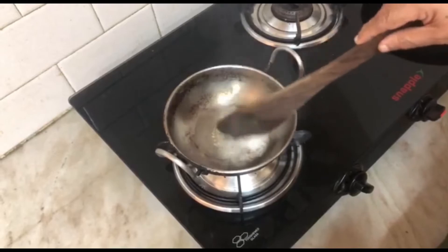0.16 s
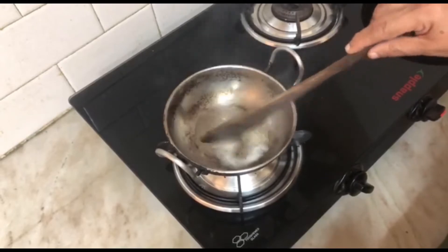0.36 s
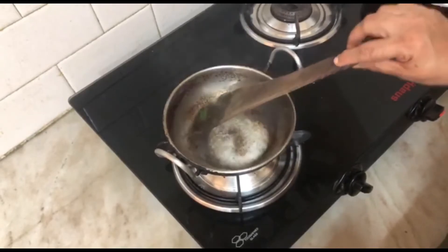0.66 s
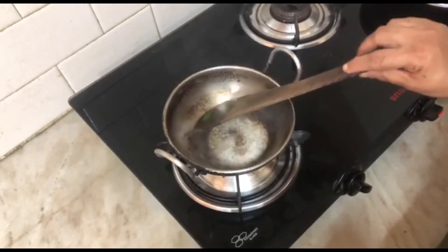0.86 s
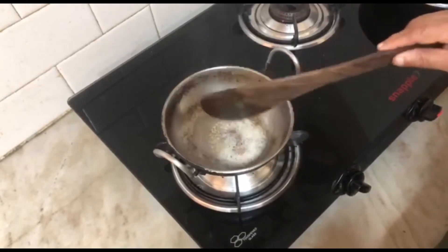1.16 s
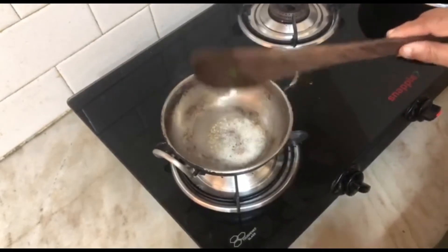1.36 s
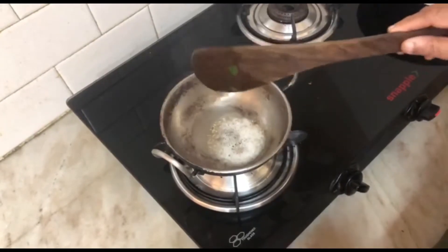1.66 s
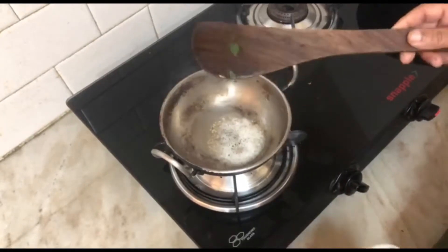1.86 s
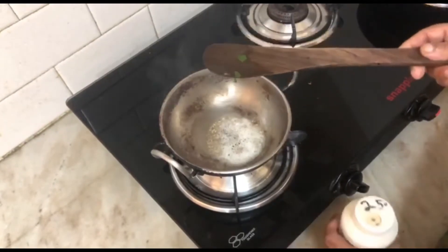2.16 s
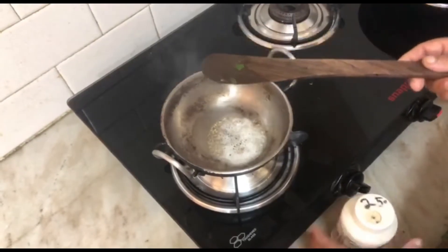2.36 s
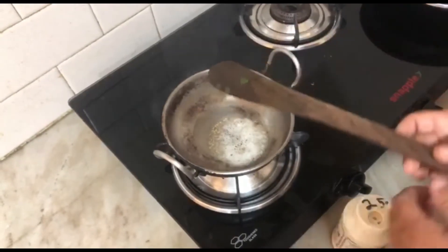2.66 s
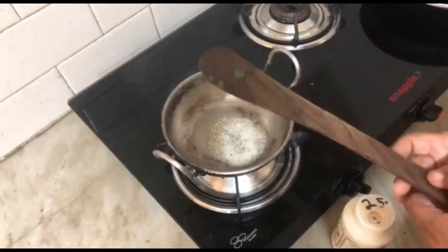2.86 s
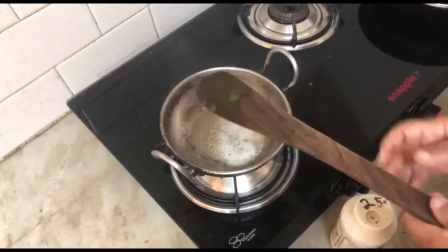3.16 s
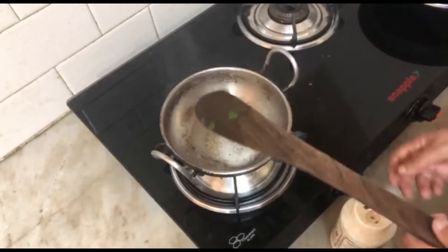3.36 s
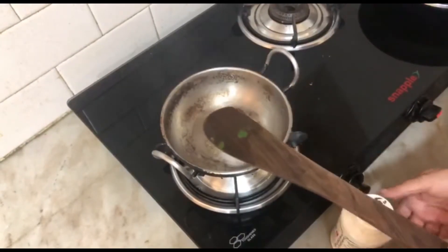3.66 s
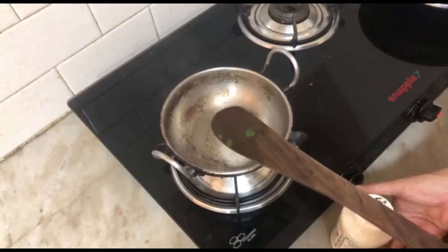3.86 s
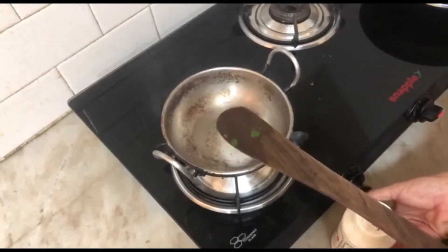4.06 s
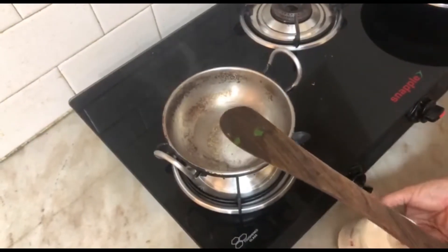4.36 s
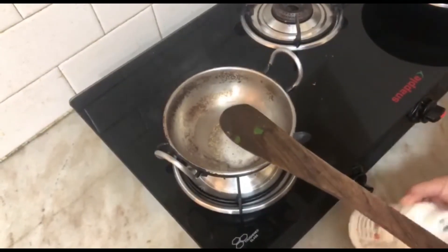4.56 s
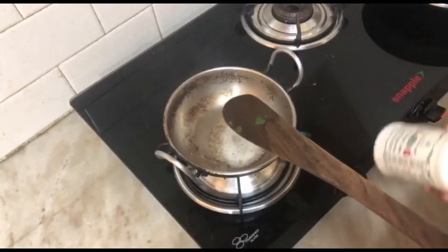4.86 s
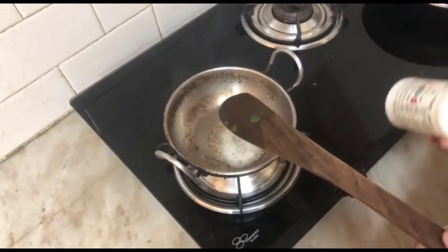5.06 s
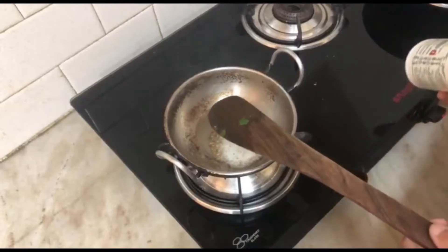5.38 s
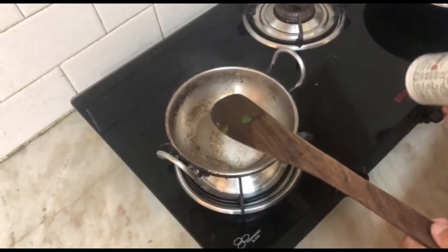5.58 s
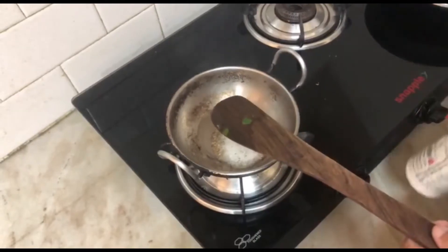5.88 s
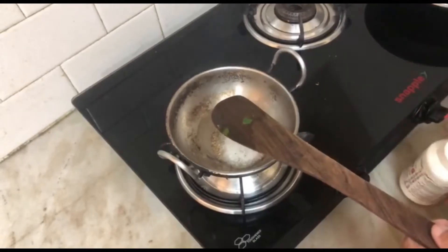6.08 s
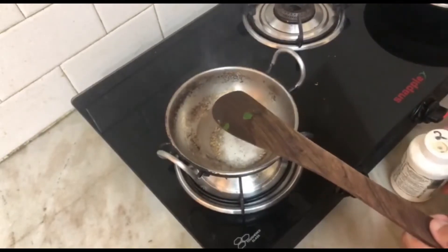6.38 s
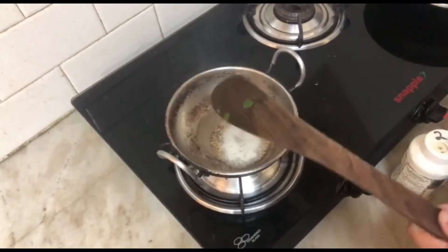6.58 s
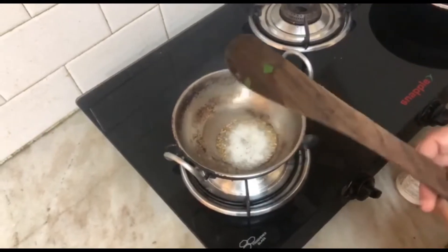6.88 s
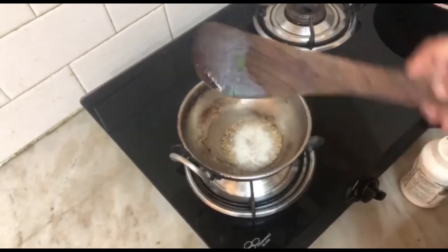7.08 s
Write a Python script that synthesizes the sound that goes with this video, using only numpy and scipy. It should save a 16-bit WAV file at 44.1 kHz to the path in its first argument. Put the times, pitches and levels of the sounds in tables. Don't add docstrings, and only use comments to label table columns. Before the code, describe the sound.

A soft, steady gas-flame rush with a low room hum runs for about seven seconds, under a faint fizz and tiny bubbling from oil in a small steel pan. From 0 to 0.9 s a wooden spatula drags and scrapes in short grainy hisses while seeds burst thickly; the loudest crack is near 0.17 s, another sharp one at 0.4 s. Small spits patter until 1.5 s, when a strong round pop comes at 1.56 s. Lighter pops and a faint knock follow around 2.1 s, then clusters near 2.9, 3.4, 3.7 and 4.5 s, with weak bumps near 4.0 and 4.25 s. A bright loud snap hits at 5.37 s. At 6.06 s a jar thuds hollowly on the hob, with smaller knocks from 6.27 to 6.43 s. Sparse tiny plops end it. Close microphone, short tiled echo.

```python
import sys
import numpy as np
from scipy import signal
from scipy.fft import rfft, irfft, next_fast_len
from scipy.io import wavfile
from scipy.ndimage import uniform_filter1d

SR = 44100
rng = np.random.default_rng(int(sys.argv[2]) if len(sys.argv) > 2 else 0)


def inscribe(sig):
    pcm = np.round(np.clip(np.atleast_2d(sig).T, -1, 1) * 32767)
    wavfile.write(sys.argv[1], SR, pcm.astype(np.int16))


N = 318842

# frequency_hz, density_db
FLAME_SPECTRUM = [(88, -45), (150, 1), (419, -0.5), (627, -4), (739, 2), (973, -10), (1240, -4.5),
                  (1720, -9.5), (2180, -10), (2570, -10.5), (5660, -19.5), (10400, -29), (12000, -33),
                  (15600, -71), (22000, -120)]
# frequency_hz, width_hz, level_db
ROOM_HUM = [(52, 17, -63), (94.7, 30, -60.5), (134.6, 12.4, -66.5), (178, 55, -72.5), (285, 33, -73.5)]
# time_s, level_db
FIZZ_LEVEL = [(0.9, -60.5), (1.27, -62.5), (1.66, -63), (2.59, -62), (3.26, -67), (3.58, -63),
              (4.16, -66.5), (4.87, -61), (5.26, -67), (5.5, -63), (6.29, -59.5), (6.45, -69), (7.23, -67)]
# frequency_hz, gain_db
FIZZ_SPECTRUM = [(600, -18), (1200, -8), (2000, -2), (3000, -11.5), (5000, -6), (7000, -10), (9000, -16.5),
                 (12000, -13)]
# frequency_hz, t60_s, rate_per_s, level_db
BOWL_MODES = [(755.4, 0.073, 35, -65.5), (1273, 0.098, 50, -72), (1971, 0.032, 56, -71),
              (2227, 0.027, 50, -69.5), (3100, 0.012, 29, -76)]
# start_s, length_s, level_db
STROKES = [
    (.001, 0.16, -51),
    (.17, 0.17, -52.5),
    (0.409, 0.079, -53),
    (0.705, 0.09, -51),
    (.83, .05, -64),
]
# frequency_hz, gain_db
RUB_SPECTRUM = [(150, 2.5), (300, -0.5), (700, 2), (1200, -2.5), (2000, 0), (3000, -4), (5000, -1),
                (7000, -3.5), (9000, -9), (12000, -16)]
# start_s, peak_db, crack_hz, deep_db, bowl_db
MUFFLED_POPS = [
    (0.0206, -30, 5130, -18, 5),
    (.0952, -20.5, 4400, -9, -1),
    (0.137, -39, 3320, 8, 8),
    (.217, -25.5, 3430, 1.5, 2),
    (.8587, -31.5, 4380, -20, -16),
    (2.1218, -24.5, 3970, -0.5, 5.5),
    (2.9225, -32.5, 5130, -10, -8),
    (3.7765, -36, 5460, -7, -39),
    (4.3521, -38, 3760, -5, 0),
    (5.777, -27, 5370, -21, -46),
]
# start_s, peak_db, crack_hz, deep_db, bowl_db
WET_POPS = [(0.1743, -11, 5010, -2.5, -0.5), (0.6592, -36.5, 5730, -8, -25), (0.8373, -31, 4320, -15, -8),
            (1.5645, -15, 5570, -10, -11), (1.8957, -27, 3100, 4.5, 3.5), (2.6247, -38.5, 6720, -1, -23),
            (2.875, -23.5, 5660, -0.5, -5), (3.4277, -24.5, 4510, 2, -0.5), (3.53, -33.5, 4740, -26, -5),
            (4.491, -38, 4440, -5, 1), (4.532, -34.5, 6030, 3, -1), (5.46, -38, 4780, 18, 1),
            (5.6592, -26, 4560, 4.5, -2)]
# start_s, peak_db, crack_hz, deep_db, bowl_db
DRY_POPS = [(.0665, -27.5, 6600, -15, -7), (.3891, -15.5, 4830, -8, -10.5), (.4344, -26.5, 3530, 2, -1.5),
            (0.7083, -41, 7200, 15, 0), (0.7208, -32.5, 6800, -19, -22), (.8018, -33.5, 6800, -20, -10),
            (.8456, -24, 6440, -2, -2.5), (1.6, -37.5, 4310, -17, 1), (3.6833, -32.5, 4640, -9, 5),
            (3.7664, -36, 6100, -21, -11), (4.4841, -30, 5340, -6, -7), (4.7977, -32, 4930, -3, -9),
            (4.8865, -31.5, 4690, 4.5, -14), (4.9989, -39.5, 4610, -20, -7),
            (6.1316, -25.5, 5450, -3, -4.5), (6.4818, -34, 3320, 1, 1)]
# start_s, peak_db, crack_hz, deep_db, bowl_db
SNAPS = [
    (0.4176, -27.5, 6030, 7, -1),
    (1.5324, -42, 4570, -11, -10),
    (2.1045, -35.5, 6070, -18, -12),
    (2.6334, -41, 4740, -13, 0),
    (3.9471, -37.5, 4160, -14, -16),
    (5.3664, -17.5, 5500, -5, -7.5),
    (6.4531, -44, 5860, -10, -5),
]
# start_s, peak_db, crack_hz
SPITS = [(.1515, -41.5, 5600), (0.168, -41, 3270), (.5214, -44, 4090), (.774, -38, 6100),
         (.8098, -44, 7670), (1.037, -44, 5930), (1.162, -45, 3190), (1.192, -45, 5640),
         (1.2155, -38.5, 4630), (1.251, -43, 4420), (1.2977, -46, 3160), (1.4049, -40.5, 5680),
         (1.4229, -43, 5600), (1.4927, -41, 5200), (2.042, -45, 3500), (2.145, -44, 6500),
         (2.4804, -42, 4610), (2.5002, -41.5, 3920), (3.329, -44, 5430), (3.447, -42, 4000),
         (3.546, -41, 3300), (3.6601, -43, 5040), (4.7215, -48, 3190), (5.5778, -46.5, 6500),
         (6.86, -44, 5640)]
# deep_db, bowl_db, edge_db
SPIT_SPECTRUM = (-13, -13, -24)
# start_s, peak_db, deep_db
PLOPS = [(0.5526, -43, 1), (.9426, -43, -11), (.9607, -46, -12), (1.085, -43, 1), (1.3332, -40, -27),
         (1.7012, -44, -14), (2.4325, -41, 23.5), (2.471, -41, 1), (3.322, -43, 5), (4.11, -41, -11),
         (4.7635, -40, 0), (5.2148, -36.5, -37), (5.301, -40, -24), (5.4516, -39.5, -13), (5.913, -47, -13),
         (6.7458, -45, -15), (7.159, -39.5, 0)]
# delay_s, level_db
PAN_ECHOES = [(.0013, -60), (.0044, -14), (.0064, -22), (0.012, -38)]
# frequency_hz, t60_s
KITCHEN_DECAY = [(500, 0.14), (1200, 0.36), (2500, 0.47), (5500, 0.31), (11000, 0.5)]
# start_s, deep_db, middle_db, upper_db, tick_db
KNOCKS = [(.168, -58, -59, -48.5, -51), (.285, -62, -56.5, -53.5, -74), (0.545, -71, -52.5, -74, -53.5),
          (.709, -60, -56, -44, -66), (2.054, -37, -50.5, -41, -76), (2.080, -38.5, -46, -65, -53.5),
          (2.205, -65.5, -39.5, -42, -63.5), (3.98, -47, -57, -51.5, -88), (4.008, -76, -49, -56, -87),
          (4.249, -45, -56, -73, -59), (6.063, -30.5, -34, -37.5, -42.5),
          (6.2653, -36, -38.5, -39.5, -48.5), (6.3394, -41, -41.5, -38.5, -43.5),
          (6.380, -46, -59, -38.5, -50.5), (6.429, -43.5, -44.5, -47, -67), (6.989, -71.5, -52, -52.5, -63)]
# frequency_hz, level_db, t60_s
HOB_MODES = [(96.9, -2, 0.49), (134, 1.5, 0.24), (180, -0.5, 0.54), (262, -10, 0.43), (267.2, -1.5, 0.43),
             (291.5, -2.5, 0.12), (334, -5.5, 0.17), (400, -3.5, 0.13), (517, -5.5, 0.096),
             (561, -8.5, 0.16), (617, -35, 0.048), (730, -9.5, 0.055), (900, 10.5, 0.0053),
             (1107, -14, 0.1), (1310, -25, 0.022)]
# low_hz, high_hz
MIC_BAND = (38, 11780)


def gain_of(db):
    return 10 ** (np.asarray(db) / 20)


def evened(x):
    return x / np.sqrt(np.mean(x ** 2) + 1e-20)


def read(points, hz):
    f, value = np.transpose(points)
    return np.interp(np.log(hz + 1), np.log(f + 1), value)


def add(mix, s, sound):
    part = mix[round(s * SR):][:len(sound)]
    part += sound[:len(part)]


def coloured(x, points):
    size = next_fast_len(len(x))
    response = gain_of(read(points, np.fft.rfftfreq(size, 1 / SR)))
    return irfft(rfft(x, size) * response, size)[:len(x)]


def ring(t, hz, t60, rise, phase=0):
    return (1 - np.exp(-t / rise)) * gain_of(-60 * t / t60) * np.sin(2 * np.pi * hz * t + phase)


def random_bubbles(per_s, spread_db, largest):
    size = gain_of(spread_db * np.minimum(rng.exponential(1, N), largest))
    return size * (rng.random(N) < per_s / SR)


def burner():
    frames, hz = N // 256 + 5, np.fft.rfftfreq(1024, 1 / SR)
    real, imaginary, patches = rng.standard_normal((3, 513, frames))
    patches = uniform_filter1d(patches, size=5, axis=0)
    patches = evened(uniform_filter1d(patches, size=12, axis=1))
    patchy_db = 1.05
    z = (real + 1j * imaginary) * gain_of(read(FLAME_SPECTRUM, hz)[:, None] + patchy_db * patches)
    return gain_of(-56.5) * evened(signal.istft(z, nperseg=1024, noverlap=768)[1][:N])


def hum():
    hz, out = np.fft.rfftfreq(N, 1 / SR), np.zeros(N)
    for f, width, db in ROOM_HUM:
        band = rfft(rng.standard_normal(N)) / (1 + (2 * (hz - f) / width) ** 4)
        fuzzy = np.fft.ifft(band, N)
        envelope = abs(fuzzy) / np.sqrt(np.mean(abs(fuzzy) ** 2))
        out += gain_of(db) * evened(fuzzy.real / envelope ** 0.2)
    return out


def fizz():
    size = random_bubbles(4000, 3.0, 5)
    out, kind, t = np.zeros(N), rng.integers(0, 8, size=N), np.arange(128) / SR
    for k, hz in enumerate(np.geomspace(1500, 10000, 8)):
        bubble = ring(t, hz, 10 / hz, .00005) * np.sqrt(hz)
        out += signal.oaconvolve(size * (kind == k), bubble)[:N]
    s, db = np.transpose(FIZZ_LEVEL)
    trim_db = -2
    return evened(coloured(out, FIZZ_SPECTRUM)) * gain_of(trim_db + np.interp(np.arange(N) / SR, s, db))


def simmer():
    out, t = np.zeros(N), np.arange(2500) / SR
    for hz, t60, per_s, db in BOWL_MODES:
        size = random_bubbles(per_s, 3, 4)
        rings = np.zeros(N)
        for place, tuning in enumerate((.97, 1.03)):
            here = size * (np.arange(N) % 2 == place)
            rings += signal.oaconvolve(here, ring(t, hz * tuning, t60, 0.0034))[:N]
        out += gain_of(db) * evened(rings)
    return out


def stir():
    grain = evened(uniform_filter1d(rng.standard_normal(N), size=120))
    rub = evened(coloured(rng.standard_normal(N) * gain_of(2.0 * grain), RUB_SPECTRUM))
    rise_s, sag_db, t60_s = 0.0083, -4, 0.42
    out = np.zeros(N)
    for start, length, db in STROKES:
        t = np.arange(0, length + t60_s, 1 / SR)
        level = db + sag_db * np.minimum(t / length, 1) - 60 * np.maximum(t - length, 0) / t60_s
        add(out, start, np.minimum(t / rise_s, 1) * gain_of(level))
    return out * rub


def pop(db, crack_hz, deep_db, bowl_db, edge_db):
    hz = np.fft.rfftfreq(512, 1 / SR)
    dip_db = 0.38 * bowl_db - 4 * (crack_hz > 3000)
    shape = [(400, deep_db - 31), (750, deep_db - 3), (1150, deep_db), (1800, bowl_db),
             (np.sqrt(1900 * crack_hz) - 60, dip_db),
             (crack_hz, 0.12 * bowl_db - 1.0), (crack_hz, 0),
             (1.028 * crack_hz, 0.09 * edge_db - 1.5), (10200, edge_db), (13000, edge_db - 9.5)]
    late = 2 * np.pi * (1.157 * np.log(hz / 6000 + 0.013) + hz * 40 / SR)
    wall_s = round(.00057 * crack_hz) / crack_hz
    wall = 1 + gain_of(-10) * np.exp(-2j * np.pi * hz * wall_s)
    burst = irfft(wall * gain_of(read(shape, hz)) * np.exp(-1j * late))[:256]
    return gain_of(db) * burst / abs(burst).max()


def pan_paths():
    t = np.arange(700) / SR
    scatter_db, scatter_t60_s = -15.5, 0.018
    sparse = (rng.random(700) > .8) * rng.choice([-1., 1.], 700)
    path = gain_of(scatter_db - 60 * t / scatter_t60_s) * sparse * (t > .0006)
    path[0] = 1
    for s, echo_db in PAN_ECHOES:
        path[round(s * rng.uniform(.93, 1.07) * SR)] += gain_of(echo_db)
    return path


def pops():
    plop_hz, plop_bowl_db, plop_edge_db = 2200, -12, -41
    rows = [(*row, -31) for row in MUFFLED_POPS]
    rows += [(*row, -19) for row in WET_POPS]
    rows += [(*row, -14) for row in DRY_POPS]
    rows += [(*row, -8.5) for row in SNAPS]
    rows += [(*row, *SPIT_SPECTRUM) for row in SPITS]
    rows += [(s, db, plop_hz, deep, plop_bowl_db, plop_edge_db) for s, db, deep in PLOPS]
    near, sent = np.zeros((2, N))
    peak_s = .0011
    for s, *row in rows:
        burst = pop(*row)
        add(sent, s - peak_s, burst)
        add(near, s - peak_s, np.convolve(burst, pan_paths()))
    return near, sent


def kitchen(x):
    taps = np.zeros(SR // 2)
    at = np.arange(260, len(taps) - 20, 20)
    taps[at + rng.integers(0, 20, len(at))] = rng.choice([-1., 1.], len(at))
    hz, t, z = signal.stft(taps, SR, nperseg=256)
    decay = gain_of(-60 * t / read(KITCHEN_DECAY, hz)[:, None])
    tail = signal.istft(z * decay, SR, nperseg=256)[1]
    return gain_of(-8.5) * signal.fftconvolve(x, tail / np.linalg.norm(tail))[:N]


def knocks():
    out, t = np.zeros(N), np.arange(SR // 3) / SR
    damping = .8
    place_db, rattle_db, rattle_t60_s = 2, -9, 0.26
    for s, deep, middle, upper, tick_db in KNOCKS:
        high = upper + 0.44 * (tick_db - max(deep, middle, upper) + 12)
        share = [(110, deep), (180, middle), (270, upper), (450, high)]
        body = np.zeros(len(t))
        for hz, mode_db, t60 in HOB_MODES:
            place = rng.random()
            level = mode_db + read(share, hz) + place_db * np.sin(40 * place)
            body += gain_of(level) * ring(t, hz * (.99 + 0.018 * place), damping * t60, 0.42 / hz)
        thud = gain_of(high + 14.0) * ring(t, 440, 0.0063, .0002, np.pi)
        plastic = [(700, -3), (1800, -0.5), (5000, -10.5), (11000, -37)]
        tick = coloured(rng.standard_normal(len(t)), plastic)
        tick *= gain_of(tick_db + 12.5 - 60 * t / 0.04)
        stand = [(150, -38), (300, 10.5), (600, 2), (1200, -30)]
        loose = evened(coloured(rng.standard_normal(len(t)), stand))
        body += gain_of(upper + rattle_db - 60 * t / rattle_t60_s) * np.minimum(t / 0.0047, 1) * loose
        add(out, s, tick)
        add(out, s + 0.00377, gain_of(-1.0) * (body + thud))
    return out


def scene():
    steady = burner() + hum() + fizz() + simmer()
    near, sent = pops()
    return (steady + stir() + near + kitchen(sent) + knocks())[None]


def top_cut(x):
    return signal.sosfilt(signal.butter(12, 12510, fs=SR, output="sos"), x)


def record(dry):
    low_cut = signal.butter(4, MIC_BAND[0], "high", fs=SR, output="sos")
    x = signal.sosfilt(low_cut, dry)
    high_cut = signal.firwin(121, MIC_BAND[1], window=("kaiser", 8), fs=SR)
    mix = signal.oaconvolve(x, high_cut[None], "same")
    return top_cut(mix)


dry = scene()
out = record(dry)
inscribe(out)
```